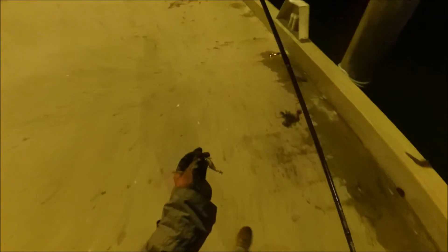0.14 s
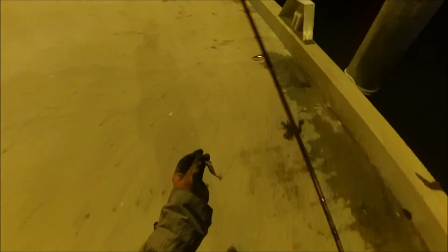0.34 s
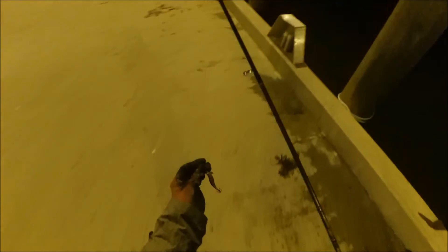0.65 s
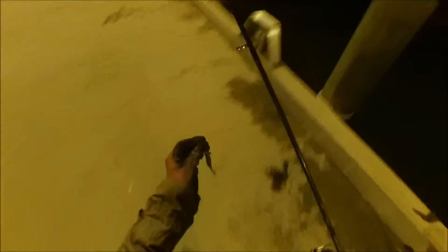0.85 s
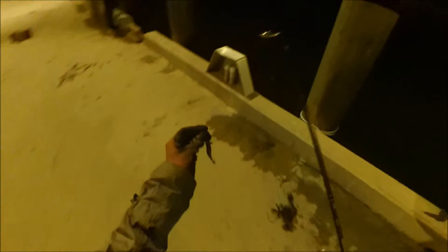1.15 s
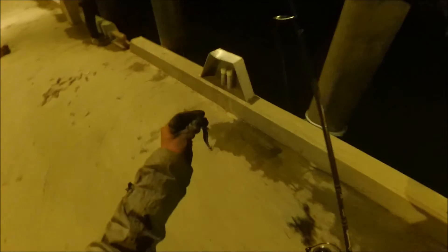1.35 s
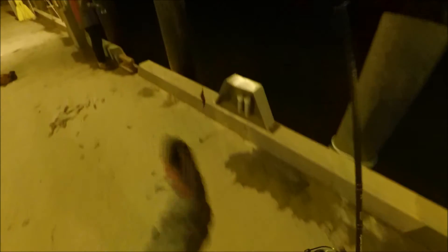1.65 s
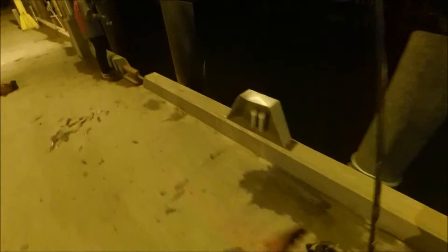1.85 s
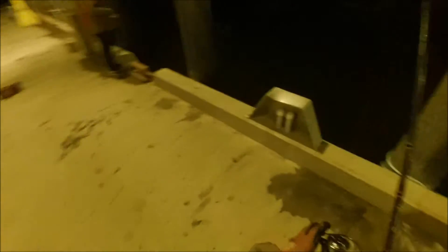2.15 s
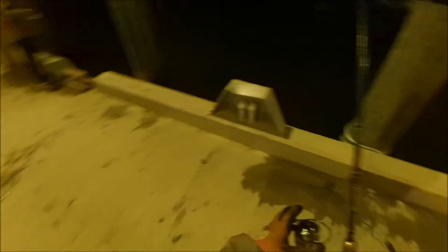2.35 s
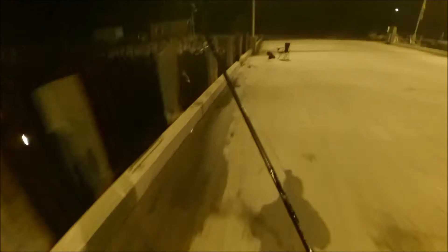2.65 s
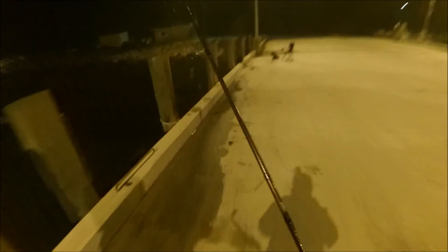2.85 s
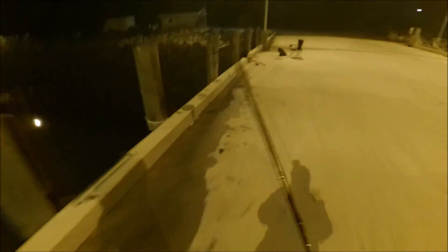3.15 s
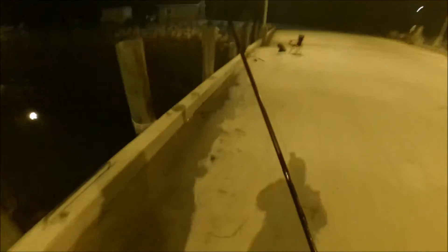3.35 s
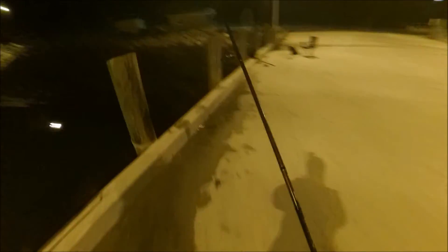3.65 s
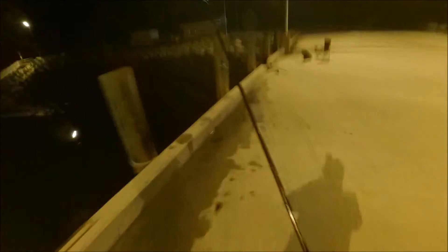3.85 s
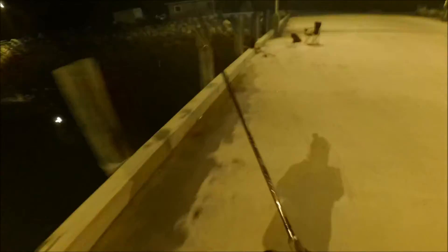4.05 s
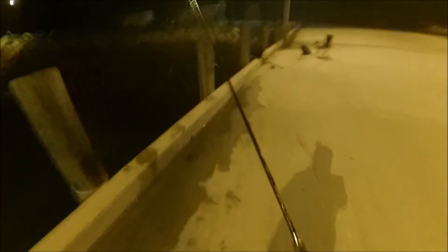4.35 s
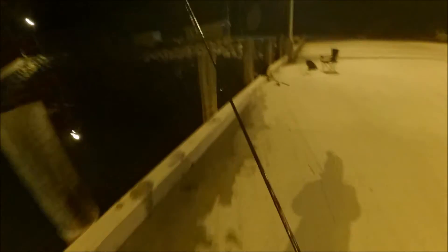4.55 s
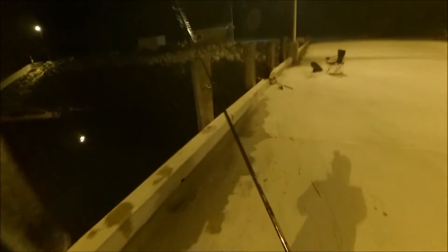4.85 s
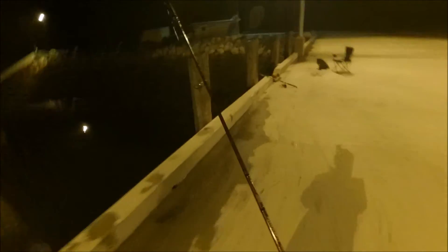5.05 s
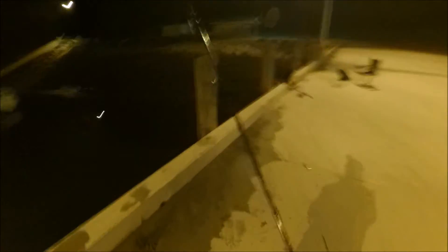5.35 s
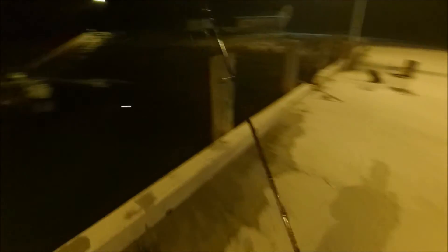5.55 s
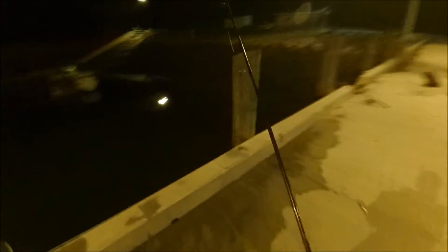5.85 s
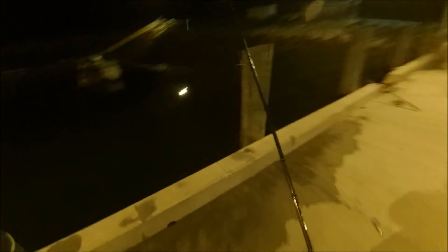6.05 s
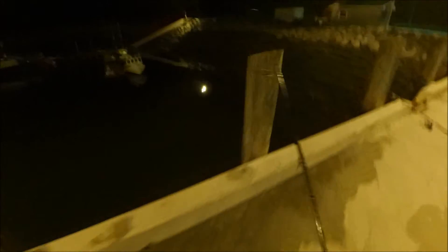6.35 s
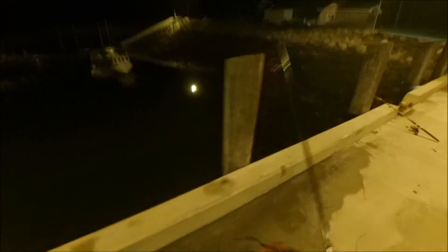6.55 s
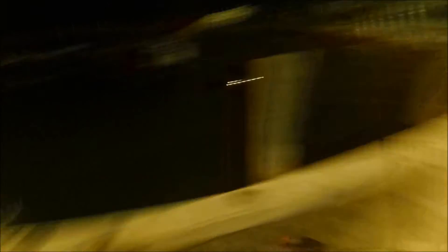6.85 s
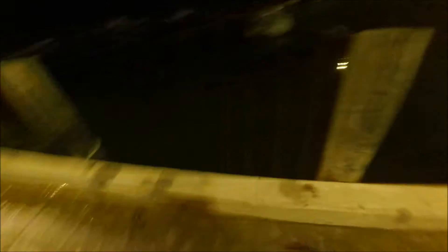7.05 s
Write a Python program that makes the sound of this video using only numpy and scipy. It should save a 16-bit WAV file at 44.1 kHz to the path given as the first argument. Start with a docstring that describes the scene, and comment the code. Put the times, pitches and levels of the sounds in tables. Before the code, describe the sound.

Someone walks on concrete carrying fishing tackle: deep dull thumps, strap rubbing, tiny ticks and knocks, two dry clicks and a late small snap.

```python
"""A low sway and faint ticks of clothes and tackle come first, then a deep thump with a muffled scuff:
someone walks a concrete wharf at night with a fishing rod, the microphone in a camera's closed case,
worn on the body. Damped swings make the thumps, shaped noise the rubbing and scuffs, short bursts of
tones the ticks. Two dry clicks (sudden steps that sink back), a short swish (swept gain on noise) and
one sharp snap (dying sines) stand over a thin high ring and a soft hiss, both of filtered noise."""
import sys
import numpy as np
from scipy import signal
from scipy.fft import rfft, irfft, next_fast_len
from scipy.io import wavfile

SR = 44100
rng = np.random.default_rng(int(sys.argv[2]) if len(sys.argv) > 2 else 0)


def to_wav(sig):
    """Store sig (one row per channel, or 1-D mono) as 16-bit WAV at the path in sys.argv[1].

    Samples outside -1..1 are clipped; the rate is SR.
    """
    pcm = np.clip(np.atleast_2d(sig), -1, 1) * 32767
    pcm = np.round(pcm).astype(np.int16)
    wavfile.write(sys.argv[1], SR, pcm.T)  # frames by channels


N = 317079
TIME = np.arange(N) / SR  # s
AROUND = np.arange(-SR // 4, SR // 2) / SR  # s before and after a crest

# Spectra of noise. Each row: frequency in Hz, relative density in dB per Hz.
# In order: quiet floor, hiss, cloth rustle, wash after the snap, strap rub, shoe scuff, grit underfoot,
# sway of the body, trembling of the mount.
FLOOR_COLOUR = [(100, 2.5), (400, -7.5), (800, -4.5), (1400, -19), (2900, -10.5), (4400, -15),
                (6000, -18.5), (7800, -15), (12500, -21), (15000, -34), (15600, -49.5)]
HISS_COLOUR = [(1500, -11), (3000, -6), (4500, -22), (5300, -4), (6100, -10), (6700, 0.5), (7600, -10),
               (8050, -6), (8700, -11), (9300, -5), (9850, -13), (10400, -2.5), (11300, -12.5), (12200, -5),
               (12950, -4.5), (13500, -21), (14000, -5), (15100, -12), (15600, -39)]
RUSTLE_COLOUR = [(600, -30.5), (1300, 1.5), (2000, -1.5), (3400, 2.5), (4400, -10), (5300, -2.5),
                 (7000, 0.5), (9500, -10), (11500, -3.5), (13000, -13), (16000, -47)]
WASH_COLOUR = [(1500, -24), (3600, 4), (4400, -8), (5300, 1), (6500, -8), (7700, 1), (8200, -5),
               (10000, -11), (14500, -14), (16000, -20)]
RUB_COLOUR = [(30, -5.5), (70, 6), (120, 1.5), (200, 1), (320, -3.5), (480, -9), (700, -39.5), (2000, -37)]
SCUFF_COLOUR = [(200, -14.5), (450, -2.5), (650, 3.5), (820, -2.5), (1080, -2), (1320, -12.5), (2000, -15),
                (3600, -20), (4600, -21.5), (9000, -48)]
GRIT_COLOUR = [(900, 0), (1300, -0.5), (2400, -1.5), (3400, -5.5), (5000, -15)]
SWAY_COLOUR = [(4, -4), (9, 5), (16, -11.5), (28, -19), (45, -29), (70, -34.5), (120, -62), (250, -85)]
TREMBLE_COLOUR = [(30, -12), (52, -0.5), (75, 1), (120, -25.5), (250, -63)]

# Level of the thin ring. Each row: time in seconds, level in dB.
RING_LEVEL = [(0, -74), (1.1, -78), (1.27, -73.5), (1.5, -79), (1.8, -71), (2.1, -74.5), (2.47, -77),
              (2.65, -85.5), (7.19, -85.5)]
# Arm movements in the jacket. Each row: centre in seconds, half length in seconds, level in dB before the
# rustle's trim.
ARM_MOVES = [(0.03, 0.03, -70), (0.7, 0.18, -70.5), (1.04, 0.1, -68), (1.6, 0.26, -67.5),
             (2.06, 0.039, -67), (2.47, 0.076, -70), (5.92, 0.052, -105), (7.13, 0.05, -73)]
# Sleeve brushing past. Each row: start in seconds, length in seconds, level in dB, centre in Hz,
# spread in octaves.
SLEEVE_BRUSHES = [(1.181, 0.07, -58.5, 4000, 1.35), (1.21, 0.09, -59, 4400, 1.25),
                  (1.262, 0.1, -66, 3700, 1.1), (1.187, 0.1, -63, 5950, 0.035),
                  (1.218, 0.07, -61, 3600, 0.06), (3.972, 0.05, -63, 1800, 0.9),
                  (7.024, 0.034, -61.5, 3250, 0.44)]

# Ticks of clothes and tackle at set times, most of them louder than the random ones.
# Each row: peak in seconds, level in dB before the tick trim.
SET_TICKS = [(0.043, -59.7), (0.0522, -55.5), (0.1215, -54.5), (0.1809, -62), (0.205, -55), (0.276, -55),
             (0.321, -52.5), (0.3906, -58.5), (0.459, -48.5), (0.4748, -55), (0.5116, -62), (0.622, -55),
             (0.6845, -57.9), (0.751, -53.6), (0.7853, -56), (0.956, -58.0), (1.024, -59), (1.033, -51),
             (1.0572, -55), (1.12, -64), (1.2034, -56), (1.2843, -59), (1.3395, -56), (1.421, -54.5),
             (1.4774, -53), (1.489, -54), (1.5115, -50.5), (1.544, -51.5), (1.5741, -56.4), (1.591, -56),
             (1.6201, -50.5), (1.6672, -57.0), (1.6819, -61), (1.6966, -64), (1.7212, -51.5), (1.7628, -55),
             (1.8288, -54.5), (1.888, -64), (1.9821, -55), (2.027, -49), (2.072, -60), (2.101, -56),
             (2.115, -55), (2.1575, -57), (2.2375, -58), (2.312, -55.5), (2.3707, -60), (2.4173, -64),
             (2.4385, -55), (2.472, -62), (2.5091, -57), (2.556, -53), (2.56, -51.5), (2.5698, -58),
             (2.6378, -57.2), (2.7077, -60), (2.7897, -52.5), (2.8349, -51), (2.8475, -58.8),
             (2.908, -55.8), (3.049, -54), (3.1628, -54.5), (3.2978, -57), (3.3692, -52), (3.379, -52),
             (3.4387, -55), (3.693, -52.5), (3.8393, -56), (3.922, -49.5), (3.9695, -57), (4.038, -59),
             (4.0532, -54.2), (4.109, -54), (4.1193, -54.5), (4.1793, -60), (4.2383, -54.5), (4.3692, -55),
             (4.4462, -50.5), (4.47, -56), (4.5082, -52.5), (4.5775, -62), (4.65, -54), (4.67, -63),
             (4.8254, -65), (4.8759, -60.1), (5.297, -62), (5.7107, -52.5), (5.7293, -54.2),
             (5.7633, -50.5), (5.777, -55), (5.7886, -55), (5.8368, -52), (5.8428, -51.5), (5.8578, -56),
             (5.89, -53), (5.8966, -54.5), (5.909, -60), (5.9178, -56), (5.9375, -54.3), (5.9467, -55),
             (5.9809, -57), (6.0486, -55), (6.058, -54), (6.1076, -54.6), (6.164, -58), (6.1878, -59.8),
             (6.249, -56), (6.308, -61), (6.3685, -54.5), (6.5082, -54.5), (6.5776, -51.5), (6.5878, -53),
             (6.7087, -64), (6.7776, -55), (6.8377, -58), (6.897, -54.3), (6.968, -60), (7.0576, -57.8),
             (7.067, -54), (7.081, -53), (7.1005, -57), (7.1134, -54), (7.1199, -50.5), (7.157, -56.9),
             (7.168, -55)]
# How thickly the random ticks fall. Each row: time in seconds, ticks per second.
TICK_RATE = [(0, 12.2), (1.3, 15.5), (1.6, 22.5), (2.6, 10.4), (3.1, 9.1), (4.4, 17.7), (4.7, 2.2),
             (5.6, 2.3), (5.9, 42.6), (6.25, 7.6), (6.9, 8), (7.1, 44)]
# Bands in which a tick rings. Each row: frequency in Hz, relative level in dB.
TICK_MODES = [(2000, -14.5), (2900, -6.5), (3600, -12.5), (5400, -8.5), (6700, 0.5), (8300, -8), (9300, -9),
              (10700, -9), (12200, -23)]
# Catch, slip and settling of a tick. Each row: offset from its peak in seconds, relative level in dB.
TICK_CONTACTS = [(-.0025, -9), (0, 0), (.0018, -9)]

# Dry clicks. Each row: start in seconds, height in dB.
CLICKS = [(0.9631, -32.5), (2.6649, -35.5)]
# Contacts of a small catch snapping shut.
# Each row: start in seconds, gain in dB, gain of the high modes on the low in dB.
SNAP_CONTACTS = [(6.6262, -52, -5), (6.6267, -38, 13), (6.6281, -24.5, -14), (6.6346, -47, -14),
                 (6.6385, -49, -4)]
# Low, then high modes of the catch. Each row: frequency in Hz, relative level in dB, t60 in seconds.
SNAP_LOW_MODES = [(890, -31, 0.016), (1380, -27, 0.014), (2530, -30, 0.045), (3100, -25, 0.013),
                  (3620, -12.5, 0.023), (3736, -9, 0.018), (3960, -26, 0.022)]
SNAP_HIGH_MODES = [(5460, -35, 0.036), (5760, -30, 0.042), (6590, 2, 0.0054), (7100, -20, 0.014),
                   (8700, -6.5, 0.0052), (9450, -18, 0.012), (11160, -14, 0.0066), (13100, -12, 0.0044),
                   (15100, -18, .005)]

# Light taps of rod and reel. Each row: start in seconds, gain in dB, pitch in Hz.
TAPS = [(0.853, -60, 2200), (0.857, -57, 2900), (0.914, -58, 2100), (0.918, -54, 2700),
        (3.378, -56.5, 2700), (3.727, -57, 2600), (3.986, -66, 2600), (4.005, -52, 2650),
        (4.031, -67, 2400), (4.052, -52, 2700), (4.064, -53.5, 2480), (4.107, -61, 2600)]
# Each row: multiple of the tap's pitch, relative level in dB, t60 in seconds.
TAP_MODES = [(1, -2, 0.02), (1.19, -3, 0.0063)]
# Hard knocks of heels and gear. Each row: start in seconds, gain in dB, pitch factor.
KNOCKS = [(0.354, -63, 0.96), (0.536, -58.5, 1), (0.585, -59, 0.85), (0.913, -56, 0.9), (0.982, -67, .98),
          (1.007, -59, 0.94), (1.089, -61, 0.91), (1.411, -57, 0.96), (1.421, -61, 1.2), (2.161, -62, 0.95),
          (2.731, -59, 1.1), (2.770, -56, 1.1), (2.803, -58, 0.9), (2.998, -60, .92), (3.274, -43, 1),
          (3.278, -55, 1.4), (3.332, -53, 0.96), (3.365, -59, 0.94), (3.482, -56.5, 1.04),
          (3.578, -60.5, 0.87), (3.726, -61, 1.1), (3.777, -53, 1.04), (3.858, -61.5, 1.1),
          (3.971, -55.5, 0.87), (4.287, -47, 1), (4.345, -54, 0.88), (4.493, -60, 0.94), (4.818, -62, 1.1),
          (5.028, -61.5, 0.82), (5.339, -51.5, 1), (5.396, -54, 0.97), (5.418, -58, 1), (5.985, -55, 0.92),
          (6.462, -58.5, 0.94), (6.536, -60, 1), (6.781, -63, 0.89)]
# Each row: frequency in Hz at pitch factor 1, relative level in dB, t60 in seconds.
KNOCK_MODES = [(700, -23, 0.0064), (1068, 3, 0.02), (1390, 1, 0.0028), (2450, -7, 0.012)]

# Body shifting under the strap. Each row: crest in seconds, scuff in dB, strap rub on the scuff in dB.
# Scuff and rub are levels before their trims, here and in the steps.
BODY_SHIFTS = [(0.06, -79, 12), (0.22, -85, 5), (0.5, -79.5, 11), (0.6, -78, 6), (0.68, -80, 15),
               (0.77, -85, 3), (0.925, -63.5, -0.5), (0.99, -75, 10), (1.1, -67, -11), (1.16, -76, 10),
               (1.26, -75, 3), (1.36, -73.5, 5), (1.52, -76, 10.5), (1.7, -71, 5), (1.84, -75.5, 13),
               (2.24, -89, 12), (2.33, -79, 15), (2.45, -89, 14), (2.6, -63, 1), (3.08, -77, 8),
               (3.19, -66, 3.5), (3.258, -69, 10.5), (3.309, -61, -9), (3.63, -73.5, 7), (3.72, -68.5, 1.5),
               (3.87, -81, 6), (4.06, -66.5, 5), (4.2, -67, -2), (4.65, -74, 9.5), (4.95, -71, 7),
               (5.02, -81, 4), (5.23, -74.5, 6.5), (5.58, -75, -6), (6.2, -81, 5), (6.26, -80, 10),
               (6.42, -78, 1), (6.8, -71.5, 7.5), (6.96, -78.5, 9), (7.04, -75, 14)]
# Lulls as the body glides. Each row: centre in seconds, half length in seconds, depth in dB.
LULLS = [(0.107, 0.02, -20), (0.442, 0.018, -12.5), (1.79, 0.016, -14), (1.889, 0.023, -14.5),
         (2.19, 0.023, -2.5), (2.91, 0.042, -6), (3.01, 0.017, -0.5), (3.554, 0.02, -11.5),
         (4.02, 0.01, -6), (4.578, 0.019, -17), (5.118, 0.032, -7), (5.17, 0.019, -24), (5.666, 0.031, -10),
         (6.132, 0.026, -14), (6.35, 0.047, -7), (6.602, .03, -1), (6.735, 0.023, -5)]
# Other thumps: bumps of the camera and the second thump of one step.
# Each row: crest in seconds, thump in dB, swing in Hz, rise in seconds, fall in seconds, shudder in dB.
OTHER_THUMPS = [(0.8, -41, 24, 0.0077, 0.015, -34.5), (0.923, -12, 11.5, 0.018, 0.021, -39),
                (2.098, -30.5, 23, 0.011, 0.0093, -40.5), (2.599, -15.5, 22.7, 0.019, 0.017, -27),
                (3.679, -22.5, 28, 0.003, 0.0079, -42), (4.041, -20, 10, 0.017, 0.067, -52),
                (4.168, -33, 49, 0.01, 0.0042, -45), (4.684, -26, 15.6, 0.038, 0.086, -32.5),
                (5.771, -51, 12, .015, 0.032, -36)]
# Footsteps. Each row: heel crest in seconds, heel thump in dB, fall in seconds, shudder lead in seconds,
# heel shudder in dB, heel scuff in dB, sole delay in seconds, sole roll in dB, sole shudder in dB,
# sole scuff in dB, toe delay in seconds, toe scuff in dB, pitch of the mount in Hz.
STEPS = [(0.302, -14.5, 0.042, 0.039, -31.5, -67.5, 0.046, -42, -32, -66, 0.26, -73, 60.3),
         (0.86, -13.5, 0.0072, 0.026, -28, -62, 0.12, -27.5, -37.5, -66.5, 0.18, -69, 57.5),
         (1.43, -15.5, 0.028, 0.043, -30.5, -65, 0.07, -26.5, -36.5, -75, 0.2, -64.5, 53),
         (1.962, -21, 0.018, 0.029, -34, -69, .11, -18, -53, -65.5, 0.19, -68, 61),
         (2.748, -9.5, 0.028, 0.027, -26, -62, 0.086, -25, -32.5, -70.5, 0.22, -67, 52.7),
         (3.284, -5.5, 0.016, 0.04, -26.5, -66.5, 0.097, -15.5, -32.5, -67, 0.18, -62, 55.3),
         (3.793, -8, 0.016, 0.028, -21.5, -63, 0.0798, -17, -41, -66, 0.21, -63, 56.5),
         (4.295, -8.5, 0.018, 0.044, -24, -64, 0.0894, -15.5, -37.5, -64.5, .17, -60.5, 56),
         (4.82, -10, 0.02, 0.0308, -28.5, -60, 0.093, -19, -42, -69, 0.195, -73, 52),
         (5.348, -12.5, 0.029, .041, -32, -60.5, 0.096, -19, -37.5, -66.5, .15, -70.5, 56.3),
         (5.908, -15, 0.025, 0.04, -37, -65.5, 0.094, -23, -37, -69.5, 0.16, -68, 66),
         (6.481, -16, 0.043, 0.017, -31, -64, 0.097, -29, -38, -76, 0.21, -79, 56.4),
         (7.022, -20.5, 0.039, 0.021, -35.5, -70, 0.081, -31.5, -36, -69.5, 0.16, -64.5, 58.8)]
# Shudder of the mount. Each row: multiple of its pitch, relative level in dB, t60 in seconds.
SHUDDER_MODES = [(1, 2, 0.19), (1.36, -3.5, 0.12), (1.92, -10.5, 0.069)]
# Resonances of the closed case. Each row: frequency in Hz, width in Hz, lift in dB.
CASE_RESONANCES = [(1017, 39, 3), (1395, 24, 4), (1964, 123, 5.5), (2430, 120, 4), (2924, 48, 6),
                   (3660, 230, 2.5), (3970, 146, 4.5), (5226, 330, 7), (5960, 88, 7), (6540, 400, 4),
                   (7065, 125, 7), (10680, 116, 4), (11400, 1000, 1)]


def amp(db):
    """Amplitude of a level in dB."""
    return 10 ** (np.asarray(db) / 20)


def unit(x):
    """Scales x to rms 1."""
    return x / np.sqrt(np.mean(x ** 2) + 1e-20)


def add(mix, s, sound):
    """Mixes a sound in at time s, cutting what lies outside."""
    start = round(s * SR)
    sound = sound[max(-start, 0):]
    part = mix[max(start, 0):][:len(sound)]
    part += sound[:len(part)]


def colour(x, points):
    """Filters x by a spectrum of (Hz, dB) points, joined along log frequency."""
    hz, db = np.transpose(points)
    size = next_fast_len(N + SR // 2, real=True)
    f = np.fft.rfftfreq(size, 1 / SR)
    gain = amp(np.interp(np.log(f + 1), np.log(hz + 1), db))
    return irfft(rfft(x, size) * gain, size)[:N]


def noise(points):
    """Noise of rms 1 with the given spectrum."""
    return unit(colour(rng.standard_normal(N), points))


def narrow(hz, width_hz):
    """Noise of rms 1 in one steep resonance."""
    away = np.linspace(-8, 8, 65)  # distance from the centre, in widths
    return noise(np.c_[abs(hz + width_hz * away), -40 * np.log10(1 + away ** 2)])


def flutter(rate, depth_db):
    """A gain of rms 1 that wanders between random knots, rate of them a second."""
    knots = rng.standard_normal(N)
    return unit(amp(depth_db * np.interp(TIME * rate, np.arange(N), knots)))


def pulses(per_s, uneven, length, spread_db):
    """A gain of rms 1 made of short swells in a loose rhythm, differing in size."""
    chance = rng.standard_normal((900, 2))
    times = np.cumsum(np.exp(uneven * chance[:, 0])) / per_s
    sizes = amp(spread_db * chance[:, 1].clip(-2, 1.5))
    gate = np.zeros(N)
    for s, size in zip(times, sizes):
        add(gate, s, size * np.hanning(max(int(length * SR), 8)))
    return unit(gate)


def grains(per_s, spread_db):
    """Tiny cracks at random moments, a few much larger than the rest."""
    size = amp(spread_db * np.minimum(rng.exponential(1, N), 3))
    return size * rng.choice([-1, 1], N) * (rng.random(N) < per_s / SR)


def swell(rise, fall):
    """A rounded rise and fall over AROUND, of height 1 at time 0."""
    shape = 2 / (np.exp(-AROUND / rise) + np.exp(AROUND / fall))
    return signal.windows.tukey(len(AROUND), .25) * shape


def bell(s, half):
    """A smooth bump of height 1 centred at time s."""
    return np.exp(-((TIME - s) / half) ** 2)


def struck(modes, contact):
    """Dying sines of a struck body, rising over the time of contact."""
    t = TIME[:SR // 4]
    ring = sum(amp(db) * np.exp(-np.log(1000) * t / t60) * np.sin(2 * np.pi * hz * t)
               for hz, db, t60 in modes)
    return ring * (1 - np.exp(-(t / contact) ** 2))


def quiet_floor(floor_db=-74):
    """Steady noise lies under everything."""
    return amp(floor_db) * noise(FLOOR_COLOUR)


def thin_ring():
    """Narrow noise makes a line, its halo and a fainter upper band, throbbing together."""
    line = amp(-2) * narrow(3558, 22)
    halo = amp(-5) * narrow(3620, 120)
    upper = amp(-11) * narrow(3830, 120)
    throb = unit(.7 + pulses(per_s=63, uneven=.1, length=.011, spread_db=1.5))
    level = amp(np.interp(TIME, *np.transpose(RING_LEVEL)))
    return level * throb * (line + halo + upper)


def passing_hiss(start_s=4.46, end_s=6.16, attack_s=0.018, release_s=0.24, start_db=-72, sag_db_per_s=3):
    """Shaped noise sets in, sags and fades."""
    age = TIME - start_s
    gate = np.clip(np.minimum(age / attack_s, (end_s - TIME) / release_s), 0, 1)
    return gate * amp(start_db - sag_db_per_s * age) * noise(HISS_COLOUR)


def rustle(still_db=-74.5, between=0.77, trim_db=-2.5):
    """Cloth sticks and slips in quick, nearly even runs, more strongly as the arm moves."""
    slips = pulses(per_s=58, uneven=.25, length=.0045, spread_db=2)
    power = amp(still_db) ** 2 + sum(amp(db) ** 2 * bell(s, half) for s, half, db in ARM_MOVES)
    return amp(trim_db) * np.sqrt(power) * unit(slips + between) * noise(RUSTLE_COLOUR)


def brushes():
    """A sleeve brushes past: each stroke swells quickly and trails off, some with a thin whistle."""
    out = np.zeros(N)
    f = np.geomspace(200, 16000, 300)
    weave = flutter(rate=260, depth_db=2.5)
    for s, length, db, hz, spread in SLEEVE_BRUSHES:
        u = np.linspace(0, 1, int(length * SR))
        stroke = np.sin(np.pi * np.sqrt(u)) ** 2.8
        band = noise(np.c_[f, -4.3 * (np.log2(f / hz) / spread) ** 2])
        add(out, s, amp(db) * stroke * (weave * band)[:len(u)])
    return out


def random_ticks(middle_db=-63, spread_db=7):
    """More contacts fall at random, as thickly as the clothes move; gives (s, dB before trim) rows."""
    chance = rng.random((400, 2))
    due = np.cumsum(np.interp(TIME, *np.transpose(TICK_RATE))) / SR  # ticks due by each moment
    turns = np.arange(len(chance)) + chance[:, 0]
    times = np.interp(turns, due, TIME)
    levels = middle_db + spread_db * (2 * chance[:, 1] - 1)
    return np.c_[times, levels][turns < due[-1]]


def ticks(trim_db=-5, half_s=0.0007, spread_db=2.5, detune=.025):
    """Each tick catches, slips and settles in milliseconds, its bands varying in level and pitch."""
    events = [*SET_TICKS, *random_ticks()]
    t = np.arange(-SR // 400, SR // 400) / SR
    envelope = np.exp(-(t / half_s) ** 2)
    hz, mode_db = np.transpose(TICK_MODES)[:, :, None]
    out = np.zeros(N)
    draws = rng.standard_normal((600, len(TICK_CONTACTS), 3, len(TICK_MODES), 1))
    for (s, db), draw in zip(events, draws):
        for (later, contact_db), (size, tune, phase) in zip(TICK_CONTACTS, draw):
            tones = np.cos(2 * np.pi * (hz * (1 + detune * tune) * t + phase))
            ring = (amp(mode_db + spread_db * size) * tones).sum(0)
            add(out, s + later + t[0], amp(db + contact_db + trim_db) * envelope * ring)
    return out


def clicks(fall_s=0.023):
    """Each dry click is a sudden step in level that sinks back."""
    out = np.zeros(N)
    for s, db in CLICKS:
        add(out, s, amp(db) * np.exp(-TIME[:SR // 4] / fall_s))
    return out


def snap(wash_db=-50.5, wash_t60_s=0.073):
    """A small catch snaps shut and chatters, ringing at each contact and leaving a brief wash."""
    out = np.zeros(N)
    low = struck(SNAP_LOW_MODES, contact=0.00046)
    high = struck(SNAP_HIGH_MODES, contact=0.00029)
    for s, db, high_db in SNAP_CONTACTS:
        add(out, s, amp(db) * (low + amp(high_db) * high))
    wash = np.exp(-np.log(1000) * TIME / wash_t60_s) * noise(WASH_COLOUR)
    add(out, SNAP_CONTACTS[1][0], amp(wash_db) * wash)
    return out


def knocks_and_taps():
    """Heels and gear, rod and reel ring briefly as struck bodies."""
    out = np.zeros(N)
    for s, db, pitch in KNOCKS:
        add(out, s, amp(db) * struck(np.multiply(KNOCK_MODES, [pitch, 1, 1]), contact=0.0002))
    for s, db, hz in TAPS:
        add(out, s, amp(db) * struck(np.multiply(TAP_MODES, [hz, 1, 1]), contact=0.00036))
    return out


def stride(strap_db=-70.5, legs_db=-80.5):
    """Strengths of strap rub and shoe scuff over heel, sole, toe and body shifts, and the ease of lulls."""
    # each friction: delay of its crest (s), rise (s), fall (s), strap rub on the scuff (dB)
    heel = (-.013, .011, 0.026, 2)
    sole = (-0.008, .022, 0.036, 1)
    toe = (-.002, .016, .018, .5)
    strokes = [(s, db, (0, 0.015, 0.022, rub_db)) for s, db, rub_db in BODY_SHIFTS]
    for s, _, _, _, _, heel_db, sole_later, _, _, sole_db, toe_later, toe_db, _ in STEPS:
        strokes += [(s, heel_db, heel), (s + sole_later, sole_db, sole), (s + toe_later, toe_db, toe)]
    rub, scuff = np.zeros((2, N))  # summed as powers
    for s, db, (delay, rise, fall, rub_db) in strokes:
        power = (amp(db) * swell(rise, fall)) ** 2
        add(scuff, s + delay + AROUND[0], power)
        add(rub, s + delay + AROUND[0], amp(rub_db) ** 2 * power)
    ease = amp(sum(db * bell(s, half) for s, half, db in LULLS))
    # between steps the strap keeps rubbing and the legs swish
    return ease * np.sqrt(rub + amp(strap_db) ** 2), ease * np.sqrt(scuff + amp(legs_db) ** 2), ease


def grit(grit_db=-61.5):
    """Grit cracks grain by grain as the heel's weight comes on, and grinds again under the sole."""
    weight = np.zeros(N)
    for s, db, *_ in STEPS:
        add(weight, s - 0.013 + AROUND[0], amp(db) * swell(0.0026, 0.036))  # heel, just before the thump
        add(weight, s + 0.065 + AROUND[0], amp(db - 9) * swell(.012, .025))  # sole
    return amp(grit_db) * weight * unit(colour(grains(per_s=650, spread_db=3.5), GRIT_COLOUR))


def scuffs(rub, scuff, rub_db=3, scuff_db=-1.0, sand_db=-13):
    """The strap rubs in lumps; soles scrape as finely fluttering noise with cracks of sand."""
    lumps = flutter(rate=30, depth_db=2.2)
    grain = flutter(rate=300, depth_db=2.5)
    sand = unit(colour(grains(per_s=220, spread_db=3), SCUFF_COLOUR))
    strap = amp(rub_db) * rub * noise(RUB_COLOUR) * lumps
    return strap + scuff * (amp(scuff_db) * grain * noise(SCUFF_COLOUR) + amp(sand_db) * sand)


def sway(rub, ease, sway_db=-32.5, tremble_db=3):
    """The body sways as low noise, easing in lulls; the mount trembles as the strap rubs."""
    return amp(sway_db) * ease * noise(SWAY_COLOUR) + amp(tremble_db) * rub * noise(TREMBLE_COLOUR)


def thumps(heel_hz=23.47, heel_rise_s=0.015, roll_hz=10.88, roll_rise_s=0.041, roll_fall_s=0.038,
           shudder_lead_s=0.02124, other_shudder_hz=53.6):
    """The cushioned case swings fast with a heel, slower with a sole, and in the other thumps; its
    mount shudders with each."""
    jolts = [(*thump, shudder_lead_s, other_shudder_hz) for thump in OTHER_THUMPS]
    for (s, heel_db, fall, lead, heel_shudder_db, _,
         later, roll_db, sole_shudder_db, *_, mount_hz) in STEPS:
        jolts.append((s, heel_db, heel_hz, heel_rise_s, fall, heel_shudder_db, lead, mount_hz))
        jolts.append((s + later, roll_db, roll_hz, roll_rise_s, roll_fall_s,
                      sole_shudder_db, shudder_lead_s, mount_hz))
    out = np.zeros(N)
    for s, db, hz, rise, fall, shudder_db, lead, mount_hz in jolts:
        swing = swell(rise, fall) * np.cos(2 * np.pi * hz * AROUND)
        shudder = struck(np.multiply(SHUDDER_MODES, [mount_hz, 1, 1]), contact=0.011)
        add(out, s + AROUND[0], amp(db) * swing)
        add(out, s - lead, amp(shudder_db) * shudder)  # starts before the crest
    return out


def case(x):
    """The shell and the air inside it lift narrow bands, one after another."""
    for hz, width, db in CASE_RESONANCES:
        x = x + (amp(db) - 1) * signal.lfilter(*signal.iirpeak(hz, hz / width, SR), x)
    return x


def scene():
    """The case colours all of the middle but the sleeve; a trace of rub, scuff, sway and floor is side."""
    rub, scuff, ease = stride()
    inside = quiet_floor() + thin_ring() + passing_hiss() + rustle() + ticks() + clicks() + snap()
    inside += knocks_and_taps() + grit() + scuffs(rub, scuff) + sway(rub, ease) + thumps()
    mid = case(inside) + brushes()
    side = amp(-15.5) * rub * noise(RUB_COLOUR) + amp(-40) * scuff * noise(SCUFF_COLOUR)
    side += amp(-51.5) * noise(SWAY_COLOUR) + amp(-95.5) * noise(FLOOR_COLOUR)
    return np.array([mid + side, mid - side])


def record(dry, edge_hz=16000):
    """A steep low-pass limits the band."""
    lowpass = signal.firwin(511, edge_hz, window=("kaiser", 9), fs=SR)
    return signal.oaconvolve(dry, lowpass[None], "same")


dry = scene()
out = record(dry)
to_wav(out)
```